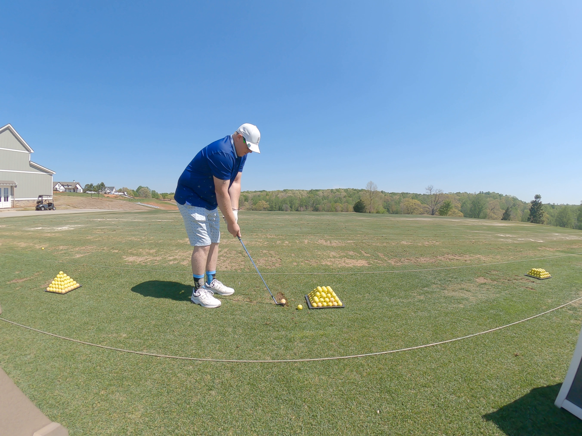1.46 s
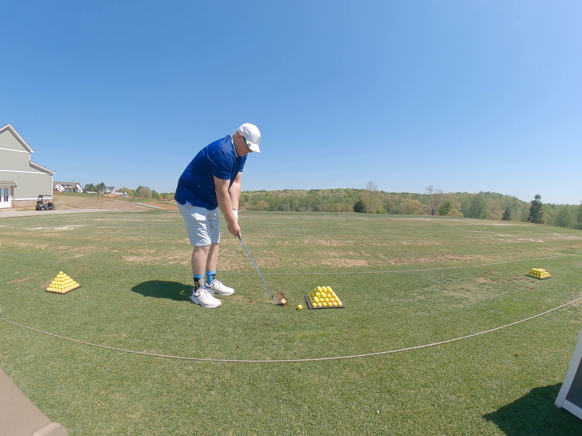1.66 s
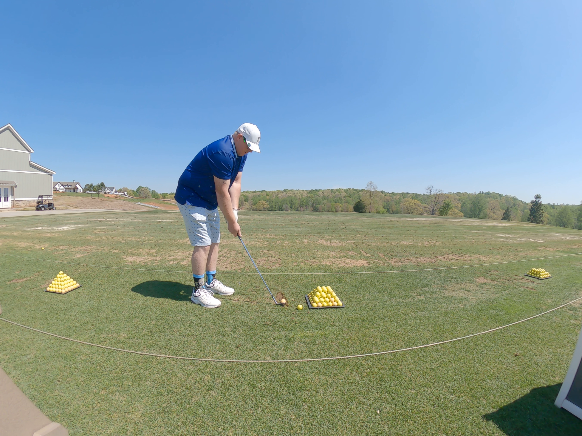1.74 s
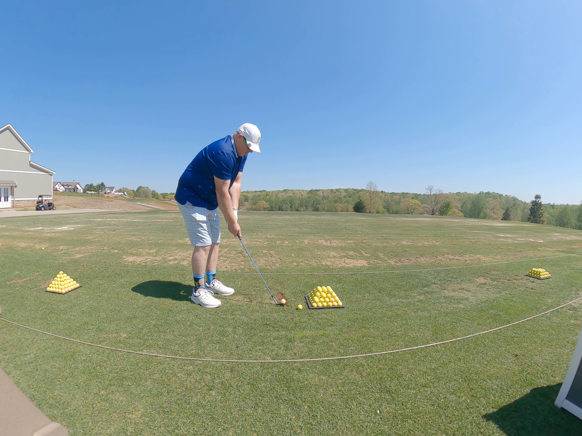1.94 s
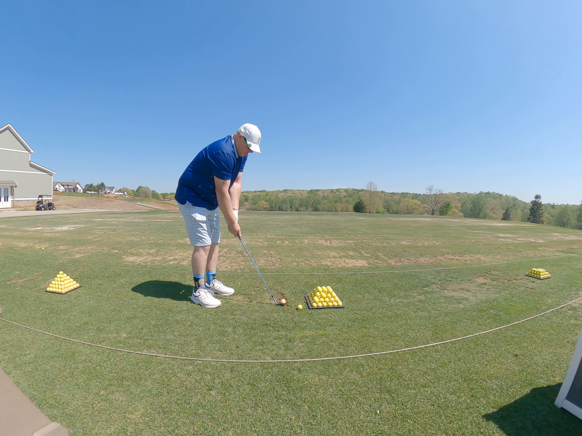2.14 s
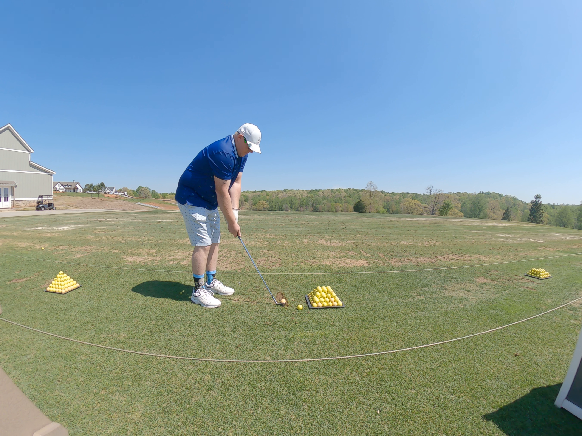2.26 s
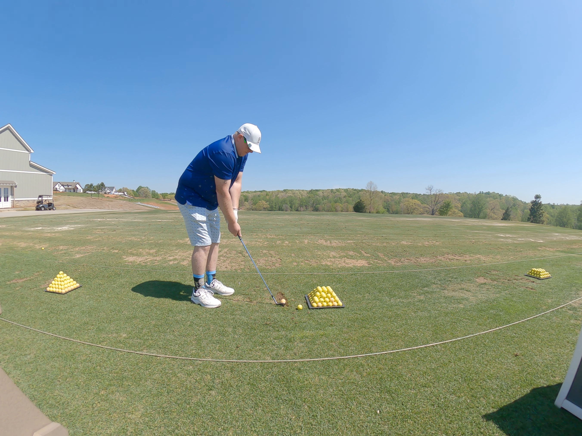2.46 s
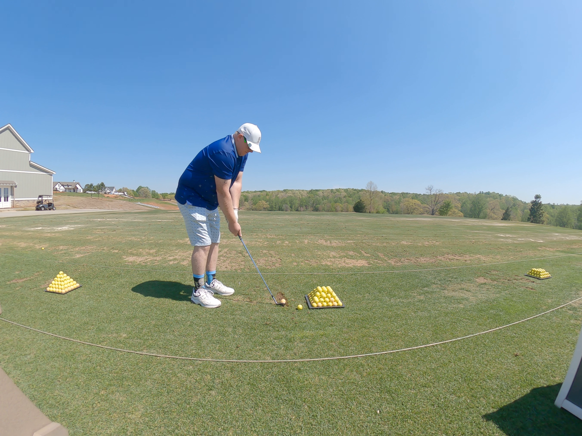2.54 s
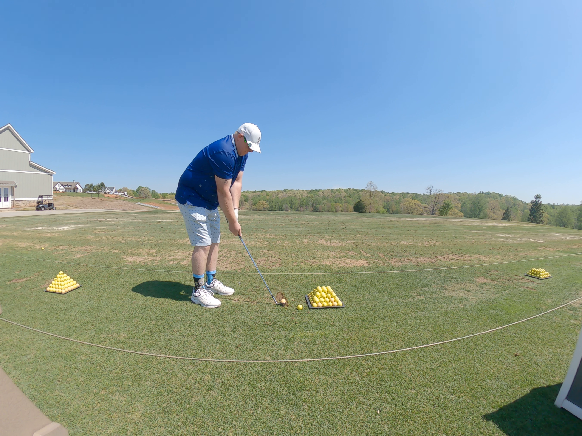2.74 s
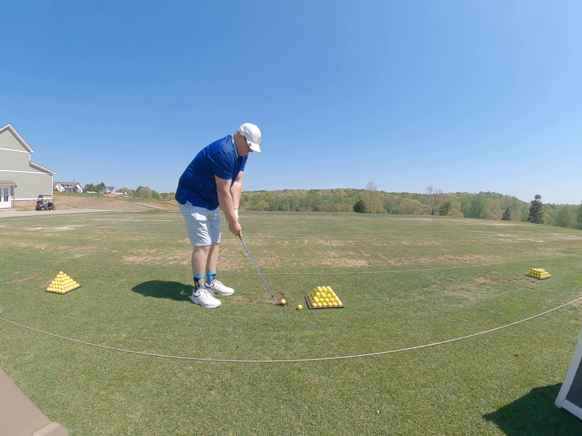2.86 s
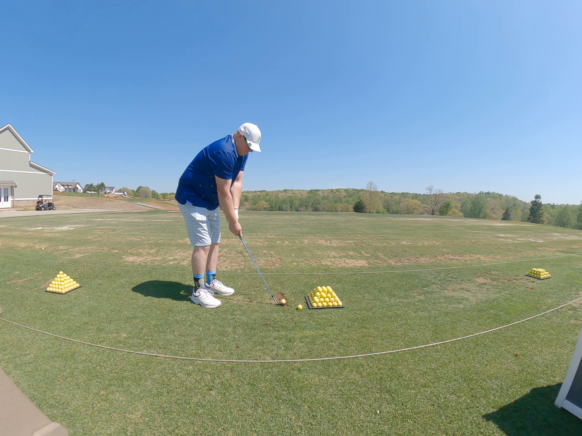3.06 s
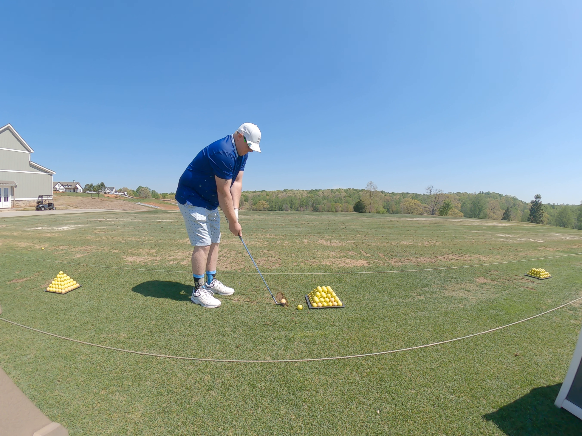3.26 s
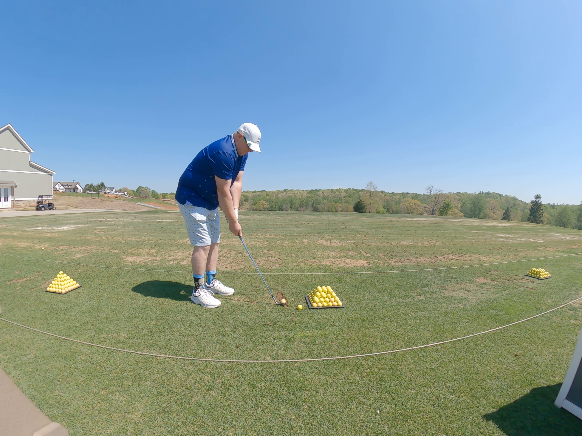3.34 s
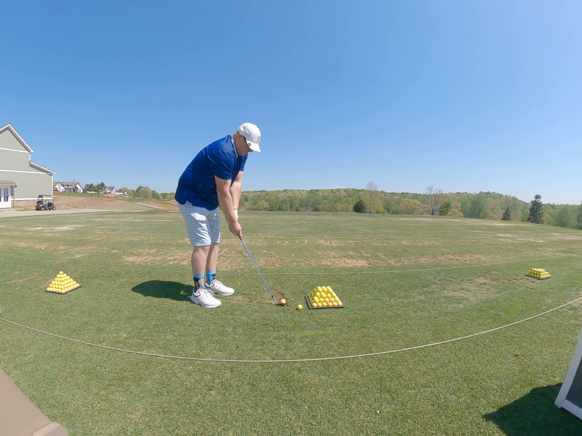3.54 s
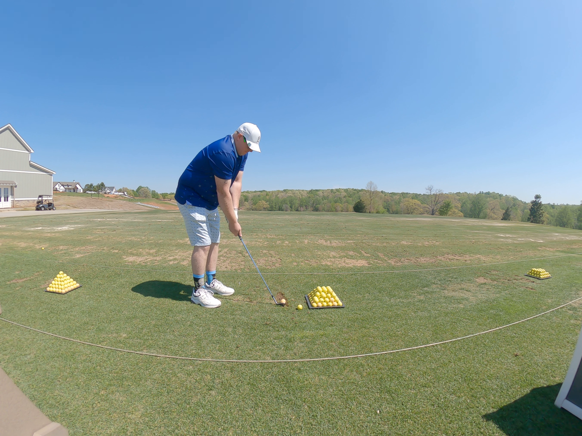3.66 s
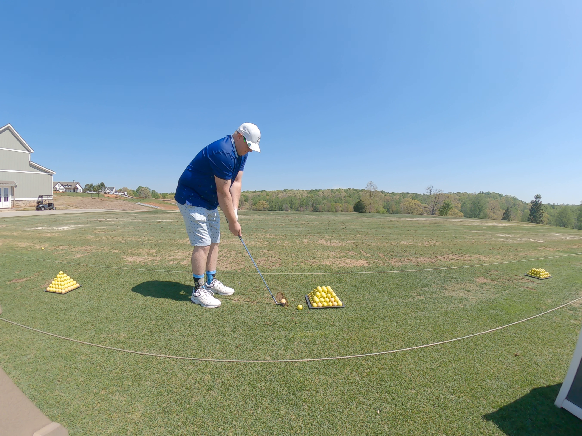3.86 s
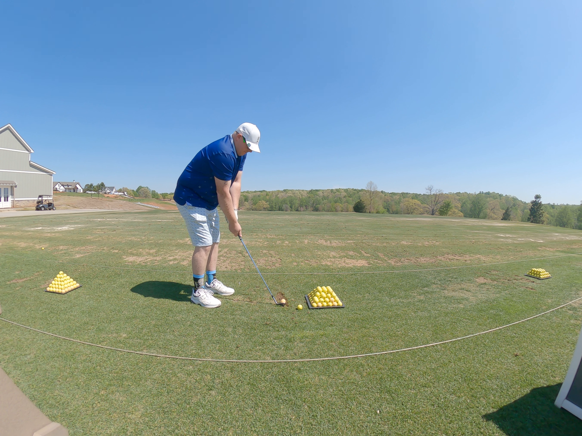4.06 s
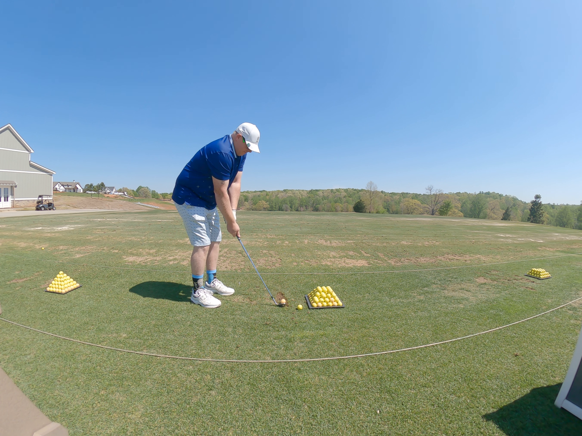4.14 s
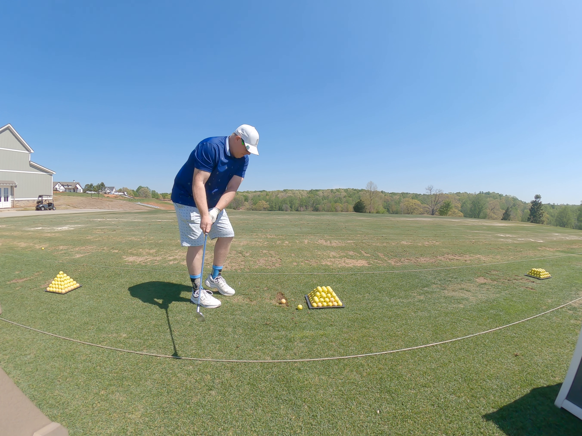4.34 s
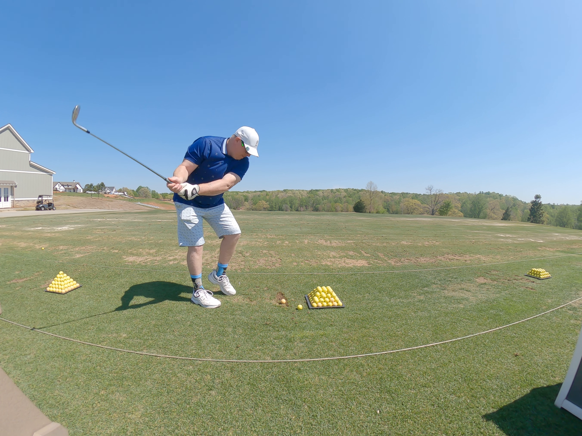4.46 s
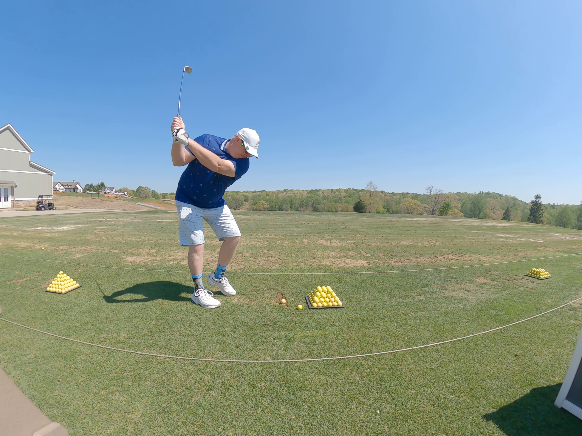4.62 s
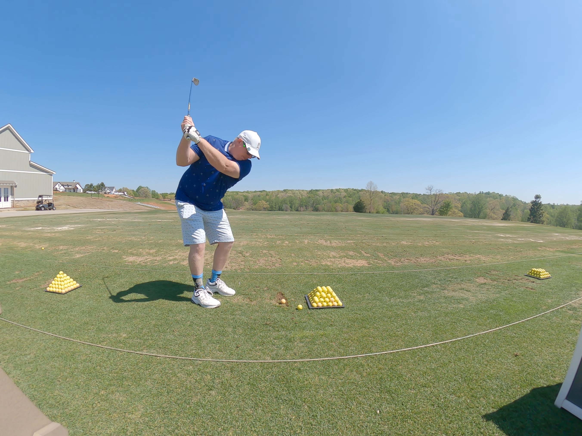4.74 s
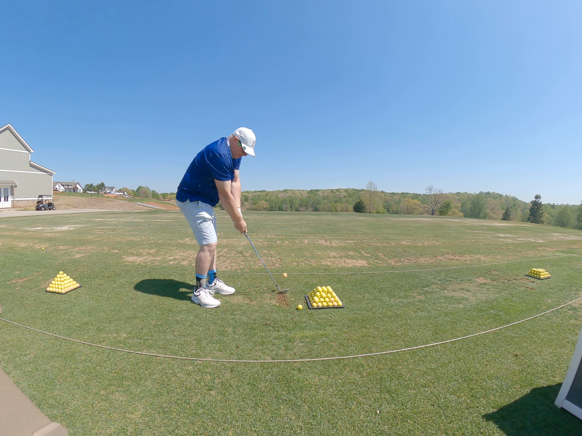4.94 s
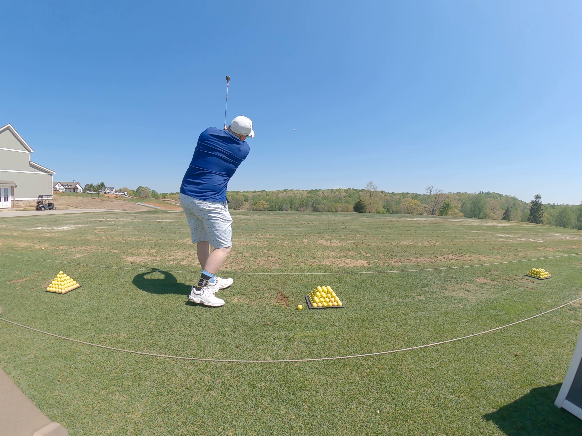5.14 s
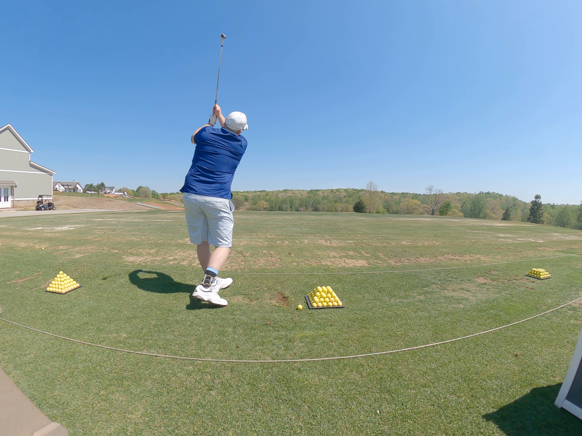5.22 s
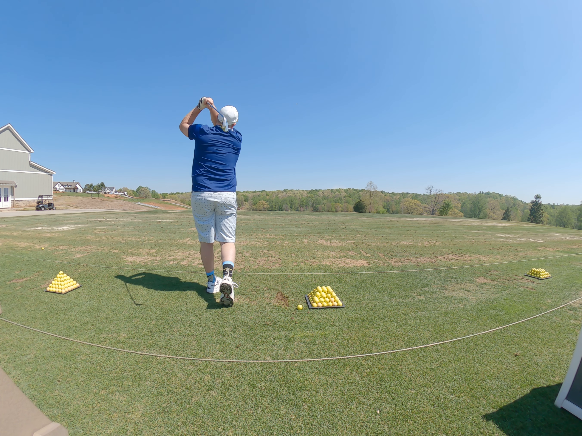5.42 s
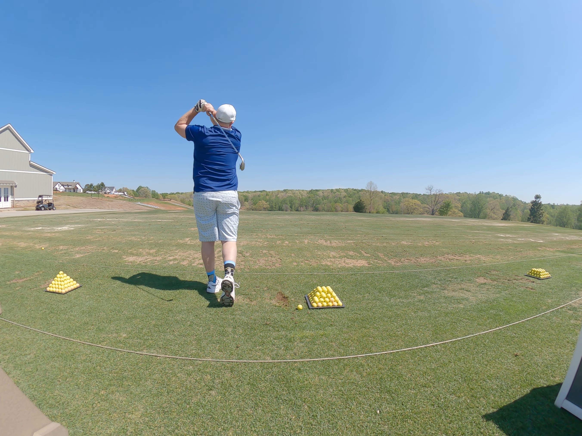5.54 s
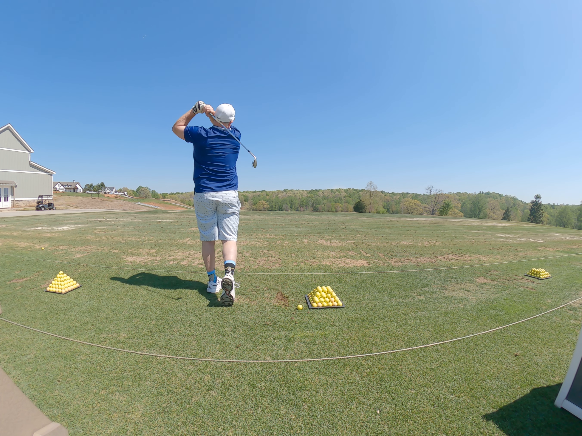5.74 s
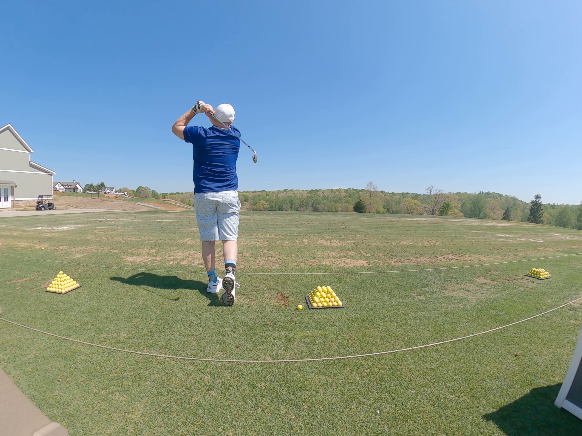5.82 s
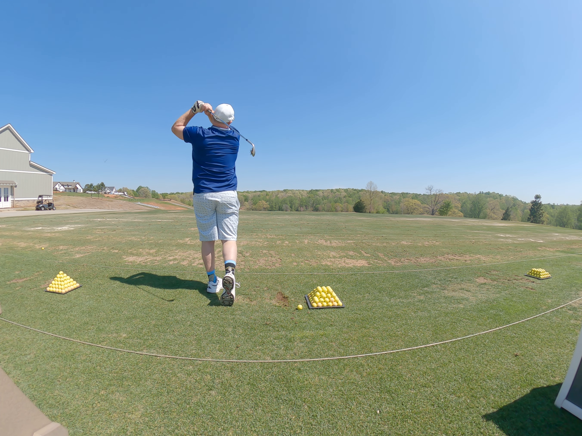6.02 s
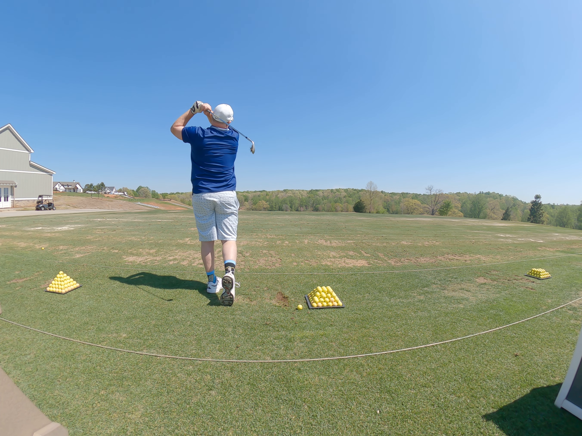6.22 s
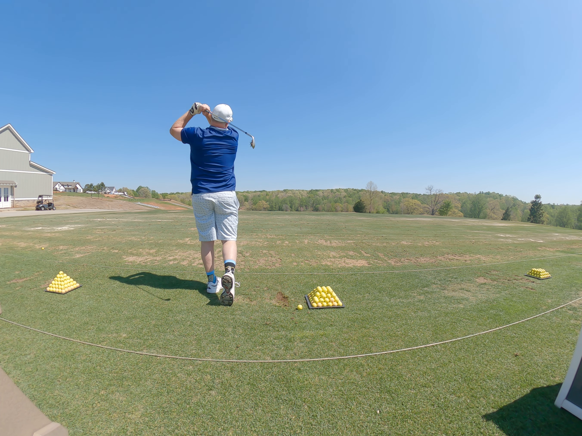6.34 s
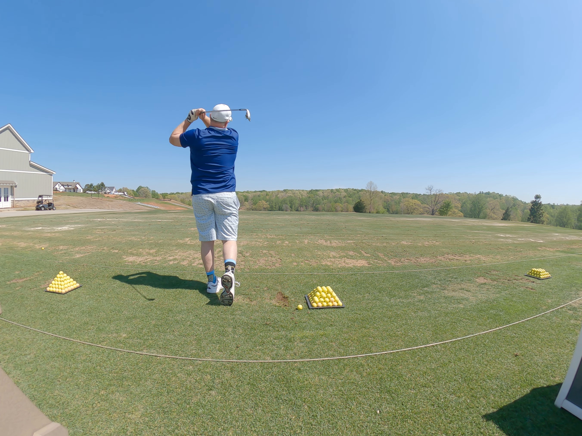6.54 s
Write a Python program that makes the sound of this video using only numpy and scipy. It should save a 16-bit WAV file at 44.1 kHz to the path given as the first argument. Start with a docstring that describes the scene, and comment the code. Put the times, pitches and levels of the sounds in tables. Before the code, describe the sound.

One crisp crack of an iron hitting a golf ball stands out, heard outdoors from a few metres away. Before it there is only a low rumble, the throb of far-off mowers, faint chirps and a couple of soft thumps. A quick swish leads into the hit near the end; then a slight echo returns from a wall, dirt sprinkles onto the grass and shoes scuff quietly as the drone continues.

```python
"""An iron strikes a golf ball on open grass: a brief contact force sets ball and steel head ringing.
Clothes rustle and the shaft sheds vortices on the way down; the turf thuds, soil patters, shoes scuff.
The wall of a house reflects the crack as a chirping echo. Two far-off mowers drone and beat against
each other amid low rumble, faint hiss and birdsong. A small camera hears it from a few metres away."""
import sys
import numpy as np
from scipy import signal
from scipy.fft import rfft, irfft, next_fast_len
from scipy.io import wavfile

SR = 44100
rng = np.random.default_rng(int(sys.argv[2]) if len(sys.argv) > 2 else 0)


def unload_audio(sound):
    """Save the sound as a 16-bit wav file, at the path given as the first command line argument."""
    columns = np.transpose(np.atleast_2d(sound))
    # keep every value between -1 and 1, then stretch to whole-number steps
    steps = np.round(np.clip(columns, -1, 1) * 32767)
    wavfile.write(sys.argv[1], SR, steps.astype(np.int16))


N = 290178
T = np.arange(N) / SR
BRIEF = T[:SR // 4]  # time within one short event
IMPACT_S = 5.0678


def strike(bite_s=0.0032, contact_s=0.00013, ring_t60_s=.018, push_db=-8, snap_db=-13.5, turf_db=-20):
    """Impact excitation: the ball is squashed for half a millisecond, then ball and head ring freely."""
    # modes of ball and shaft: frequency_hz, level_db
    ball_modes = [(612, -27.5), (900, -20), (1210, -17.5), (1445, -13.5), (1730, -19.5), (2064, -22),
                  (2280, -18.5), (2960, -14), (3110, -14), (3320, -15.5)]
    # modes of the steel head: frequency_hz, level_db
    head_modes = [(4260, -25.5), (4800, -27), (5560, -24.5), (6480, -28.5), (7780, -24), (9480, -26)]
    # grooves scraping the ball's cover: frequency_hz, density_db
    snap_spectrum = [(3500, -9), (6000, -5.5), (9500, -1.5), (11000, -9.5), (12900, -30.5), (14200, -23),
                     (16000, -48.5)]
    # blade tearing grass: frequency_hz, density_db
    turf_spectrum = [(150, 7), (900, -0.5), (4000, -9), (9500, -17), (14000, -42.5)]
    squash = (BRIEF - bite_s - contact_s) / contact_s
    push = amp(push_db) * squash * np.exp((1 - squash ** 2) / 2)
    snap = amp(snap_db) * noise(snap_spectrum, decay(t60=.004, after=bite_s))
    release_s = bite_s + 2 * contact_s  # the ball springs off the face
    ball = modes(ball_modes, ring_t60_s, after=release_s)
    head = modes(head_modes, ring_t60_s, after=release_s)
    # the leading edge presses into the grass just before the ball and digs in after it
    press = amp(1.5) * np.sqrt(BRIEF / bite_s) * (BRIEF < bite_s)
    turf = amp(turf_db) * noise(turf_spectrum, press + decay(t60=0.032, after=bite_s))
    crack, bright = np.zeros((2, N))
    add(crack, IMPACT_S - bite_s, push + ball + turf)
    add(bright, IMPACT_S - bite_s, snap + head)
    return crack, bright


def thumps(give_s=0.0014):
    """Damped oscillation: the turf gives softly under each blow and rings for a few cycles."""
    # dull thumps in the ground: start_s, level_db, pitch_hz, t60_s
    blows = [(3.698, -12, 135, 0.023), (4.768, -17.5, 205, 0.039), (5.07, -7, 100, 0.045),
             (5.0713, -12.5, 186, 0.041)]
    onset = (1 - np.exp(-BRIEF / give_s)) ** 2
    out = np.zeros(N)
    for start, db, hz, t60 in blows:
        add(out, start, amp(db) * ring(hz, t60) * onset)
    return out


def echo(delay_s=.148, echo_db=-35.5, spread_s=0.0057):
    """Reflection: each face of the house returns a burst of noise, delayed by its path length."""
    # colour of the reflection: frequency_hz, density_db
    wall_spectrum = [(400, -0.5), (900, -16), (1400, 6), (2150, 5.5), (2700, -2.5), (5200, -1.5),
                     (7500, -13), (14000, -40)]
    # reflecting faces, relative to the main return: offset_s, gain_db
    faces = [(-.024, -6), (0, 1), (.012, -6.5), (.034, -6.5)]
    # rising chirps from evenly spaced boards: start_s, length_s, from_hz, to_hz, level_db
    chirps = [(5.207, .025, 4190, 5900, -41.5), (5.209, 0.0114, 1950, 2310, -33),
              (5.244, 0.013, 1200, 1600, -36)]
    late = T - IMPACT_S - delay_s
    returns = sum(amp(echo_db + db) / (1 + ((late - offset) / spread_s) ** 4) for offset, db in faces)
    return noise(wall_spectrum, returns) + glides(chirps, jitter_hz=70)


def swish(fastest_s=5.048, half_speed_s=.046, impact_loss=0.25, full_speed_db=-38, speed_power=2.3):
    """Vortex shedding: air noise and the shaft's whistles grow with speed, and the whistles rise."""
    # air rushing past the club: frequency_hz, density_db
    air_spectrum = [(300, -12.5), (1200, -3.5), (2200, -9.5), (7500, -19.5), (11000, -31.5), (15000, -52.5)]
    # thick and thin parts of the shaft at full speed: pitch_hz, level_db, speed_exponent
    vortices = [(487, -40, 1.1), (1230, -42.5, 2.5)]
    speed = 1 / (1 + ((T - fastest_s) / half_speed_s) ** 2)
    speed *= 1 - impact_loss * (T > IMPACT_S)  # ball and turf brake the club
    out = noise(air_spectrum, amp(full_speed_db) * speed ** speed_power)
    for hz, db, exponent in vortices:
        out += amp(db) * speed ** exponent * tone(hz * speed ** .3, jitter_hz=.1 * hz, rate=250)
    return out


def clods(t60_s=0.012):
    """Inelastic impact: each falling clod stops with a dull thud and a bright tick of grit."""
    # landings: start_s, thud_db, tick_db
    landings = [(5.238, -42, -39), (5.289, -52, -47), (5.307, -31, -45), (5.326, -51, -41.5),
                (5.367, -41, -53), (5.378, -47, -47), (5.466, -44, -58)]
    # thud of a clod: frequency_hz, density_db
    clod_spectrum = [(500, -10), (1200, 4), (10000, -34)]
    # tick of grit: frequency_hz, density_db
    grit_spectrum = [(2200, -1), (5500, -2), (10500, -17), (14000, -42)]
    out = np.zeros(N)
    for start, thud_db, tick_db in landings:
        add(out, start, amp(thud_db) * noise(clod_spectrum, decay(t60_s)))
        add(out, start, amp(tick_db) * noise(grit_spectrum, decay(t60_s)))
    return out


def soil_shower(peak_s=5.225, peak_db=-43.5, rise_db_per_s=299.5, fall_db_per_s=108, dust_db=-7.5):
    """Shot noise: coarse grains and hissing dust rain down, building quickly and then thinning out."""
    # falling soil and grass: frequency_hz, density_db
    soil_spectrum = [(600, -5.5), (950, 1), (2000, -4.5), (4000, -6.5), (10000, -19.5), (15000, -50.5)]
    late = T - peak_s
    envelope = amp(peak_db + np.minimum(rise_db_per_s * late, -fall_db_per_s * late))
    coarse = envelope * grains(soil_spectrum, per_second=1400, spread_db=3.8)
    return coarse + noise(soil_spectrum, amp(dust_db) * envelope)


def clothes():
    """Friction: dense tiny slips of cloth merge into a rustle with each move."""
    # small shifts over the ball, then the swing: middle_s, length_s, level_db
    moves = [(.05, 0.27, -69), (4.32, 0.28, -68), (4.62, 0.5, -63.5), (4.95, 0.31, -63.5), (5.3, 0.53, -64),
             (5.75, 0.52, -75)]
    # rubbing cloth: frequency_hz, density_db
    cloth_spectrum = [(600, -3), (1200, 2.5), (2500, -2), (7500, -4.5), (13000, -17.5), (16000, -42.5)]
    return swells(moves) * grains(cloth_spectrum, per_second=9800, spread_db=1.5)


def shoes():
    """Stick-slip friction: soles grind on the grass in short grainy bursts."""
    # twists of a shoe: middle_s, length_s, level_db
    scuffs = [(4.77, 0.047, -54.5), (5.31, 0.026, -49), (5.52, 0.055, -58), (5.602, 0.039, -53),
              (5.66, 0.067, -50.5), (5.771, 0.032, -52.5), (5.812, 0.041, -49.5)]
    # sole on grass: frequency_hz, density_db
    sole_spectrum = [(300, 3.5), (720, -2.5), (980, 3), (1500, -6), (2800, -18), (5500, -17), (14000, -52)]
    return swells(scuffs) * grains(sole_spectrum, per_second=1600, spread_db=3.0)


def clicks():
    """Damped transients: light contacts of grip, clothing and shoes each excite a band of noise."""
    # contacts: start_s, level_db, t60_s, centre_hz
    contacts = [(0.128, -57, 0.049, 7000), (4.591, -48.5, 0.018, 4186), (5.008, -40.5, 0.011, 4627),
                (5.626, -48.5, .03, 1700), (5.766, -52, 0.027, 1600), (5.806, -48, 0.025, 4200)]
    # band of one click: multiple_of_centre, density_db
    band = [(0.249, -11.5), (.45, -5.5), (1, -1), (2, -17.5), (3.2, -48)]
    out = np.zeros(N)
    for start, db, t60, hz in contacts:
        spectrum = [(multiple * hz, density_db) for multiple, density_db in band]
        add(out, start, amp(db) * noise(spectrum, decay(t60)))
    return out


def taps(t60_s=0.096):
    """Free vibration: the club head brushes the grass and rings faintly."""
    # light touches of the head: start_s, level_db
    touches = [(.894, -61), (3.972, -59.5), (5.592, -58)]
    # brushed grass: frequency_hz, density_db
    brush_spectrum = [(1000, 0), (4600, 0), (9500, -12), (13000, -24)]
    # modes of the tapped head: frequency_hz, level_db
    tap_modes = [(3090, -10), (5260, -6), (9220, -15)]
    out = np.zeros(N)
    for start, db in touches:
        add(out, start, amp(db) * (noise(brush_spectrum, decay(t60_s)) + modes(tap_modes, t60_s)))
    return out


def mowers(overtone_gain_db=-5):
    """Beating: two engines fire about 19 Hz apart, so their summed drone throbs."""
    # nearer engine's speed: time_s, firing_hz
    near_rate = [(0, 84.26), (1.5, 84.97), (2.8, 84.3), (4, 84.18), (5.3, 83.3), (6.58, 83.4)]
    # its two lowest harmonics: time_s, level_db
    low_level = [(0.0, -41.5), (1.13, -36), (2.78, -38.5), (4.31, -36.5), (5.59, -36.5), (6.58, -37.5)]
    # its higher harmonics, before their gain: time_s, level_db
    overtone_level = [(1.24, -58), (1.72, -61), (2.75, -53), (3.46, -61), (5.44, -51.5), (6.29, -57.5)]
    # balance of those harmonics: multiple, gain_db
    near_orders = [(3, -3), (4, 1), (5, -7.5), (6, -12.5)]
    # farther engine: time_s, firing_hz, level_db, overtone_gain_db
    far_engine = [(0, 104.8, -50, 12), (.5, 104, -50.5, 4.5), (1.5, 104.2, -54.5, 2.5),
                  (3, 103.1, -48, -2.5), (3.4, 103.1, -44.5, -2.5), (6.58, 101.9, -42.5, -3.5)]
    # balance of its overtones: multiple, gain_db
    far_orders = [(2, -9), (3, -18.5)]
    near_hz = curve(near_rate) * (1 + .003 * walk(12))
    low = drone(near_hz, [(1, 0.92)], fade_db=1.6) + drone(near_hz, [(2, -14.5)], fade_db=1.7)
    overtones = amp(curve(overtone_level) + overtone_gain_db) * drone(near_hz, near_orders, fade_db=1.7)
    far_hz = curve(far_engine) * (1 + 0.0024 * walk(13))
    far = drone(far_hz, [(1, 0.0006)], fade_db=1.5)
    far += amp(curve(far_engine, 3)) * drone(far_hz, far_orders, fade_db=3.0)
    return amp(curve(low_level)) * low + overtones + amp(curve(far_engine, 2)) * far


def drone(hz, orders, fade_db):
    """Harmonic series of an engine's firing rate; moving air fades each harmonic on its own."""
    phase = 2 * np.pi * (np.cumsum(hz) / SR + rng.random())
    return np.sqrt(2) * sum(amp(db + fade_db * walk(3.7)) * np.sin(round(k) * phase) for k, db in orders)


def birds(reverb_db=-6):
    """Reverberation: the wood behind the tree line smears the birds' slightly hoarse whistles."""
    # a songbird's notes: slide_s, lead_s, arch_db, ending_db
    notes = [(.532, 0.028, -82, -75), (1.146, .04, -81, -81), (1.417, 0.064, -68.5, -71),
             (1.614, 0.032, -76, -77), (2.033, 0.053, -81, -77), (2.448, 0.065, -69, -70.5),
             (2.54, .049, -74, -74), (2.952, 0.061, -68.5, -67.5), (3.62, 0.079, -72.5, -68)]
    # other birds: start_s, length_s, from_hz, to_hz, level_db
    whistles = [(0.018, 0.12, 3720, 3590, -69.5), (0.683, 0.087, 3650, 3650, -80),
                (3.025, .035, 3900, 3780, -75), (5.51, .04, 2660, 3370, -63.5),
                (6.419, 0.096, 2582, 2340, -75.5)]
    song = glides(whistles, jitter_hz=50)
    for slide_at, lead_s, arch_db, ending_db in notes:
        add(song, slide_at - lead_s, slur(lead_s, arch_db, ending_db))
    wood = rng.standard_normal(len(BRIEF)) * decay(t60=0.4)
    return song + amp(reverb_db) * signal.oaconvolve(song, wood / np.linalg.norm(wood))[:N]


def slur(lead_s, arch_db, ending_db):
    """Frequency modulation: one bird note arches, slides down hoarsely and holds a short low ending."""
    top_hz, sag_hz, arch_s = 3170, 220, 0.05  # the arch peaks arch_s before the slide
    slide_s, ending_hz, ending_s = 0.0082, 2200, 0.041
    clear_jitter_hz, hoarse_jitter_hz, hoarse_s = 24, 160, .028
    flutter_db, dip_db = 2.3, 4
    since = BRIEF - lead_s
    slid = (1 + np.tanh(since / slide_s)) / 2
    arch = top_hz - sag_hz * (1 + np.minimum(since, 0) / arch_s) ** 2
    pitch = arch * (1 - slid) + ending_hz * (1 + .02 * rng.standard_normal()) * slid
    swell = np.sqrt(np.abs(np.sin(np.pi * np.minimum(BRIEF / (lead_s + ending_s), 1))))
    db = arch_db * (1 - slid) + ending_db * slid + flutter_db * walk(150, BRIEF)
    db -= dip_db * np.exp(-(since / slide_s) ** 2)
    jitter = clear_jitter_hz + hoarse_jitter_hz * slid * np.exp(-(since / hoarse_s) ** 2)
    return swell * amp(db) * tone(pitch, jitter_hz=jitter, rate=810, t=BRIEF)


def distance(whine_db=-60, whine_fade_db_per_s=38):
    """Spatial coherence: long waves of far rumble are more alike at both microphone ports than hiss."""
    # rumble of engines and air: frequency_hz, density_db
    rumble_spectrum = [(12, -30), (30, -14.5), (58, 1.5), (100, -2.5), (190, -11), (390, -23.5),
                       (520, -33.5), (800, -45)]
    # hiss of roads and trees: frequency_hz, density_db
    hiss_spectrum = [(400, 2), (750, -12.5), (1080, -0.5), (1400, -4), (1900, -13.5), (3200, -22.5),
                     (5200, -21), (7500, -23.5), (9500, -36.5), (14000, -40.5)]
    # one soft far rustle: middle_s, length_s, level_db
    rustle_swell = [(.41, 0.35, -69.5)]
    # its colour: frequency_hz, density_db
    rustle_spectrum = [(1050, 4), (1950, -0.5), (2600, -24)]
    # light puffs of air: middle_s, length_s, level_db
    puffs = [(.62, 0.47, -77), (1.75, 0.99, -79.5), (2.98, 0.39, -78.5), (6.48, 0.23, -78)]
    # the leaves they stir: frequency_hz, density_db
    leaf_spectrum = [(2800, -9.5), (4600, -1), (7600, -1.5), (14000, -28.5)]
    rumble_rms = amp(-43.5 + 1.6 * walk(4.4))
    hiss_rms = amp(-67.5 + 0.21 * walk(1.2))
    whine = amp(whine_db - whine_fade_db_per_s * T) * tone(1290, jitter_hz=70, rate=290)
    side = noise([(40, -15.5), (200, -5.5), (500, -23.5)], amp(-20.0) * rumble_rms)
    side += noise(hiss_spectrum, amp(-1.5) * hiss_rms)
    rustle = noise(rustle_spectrum, swells(rustle_swell)) + noise(leaf_spectrum, swells(puffs))
    mid = noise(rumble_spectrum, rumble_rms) + noise(hiss_spectrum, hiss_rms) + rustle + whine
    return np.array([mid + side, mid - side])


def amp(db):
    """Decibels to amplitude gain."""
    return np.exp(np.asarray(db) * np.log(10) / 20)


def curve(rows, column=1):
    """Linear interpolation of one table column over time."""
    rows = np.array(rows)
    return np.interp(T, rows[:, 0], rows[:, column])


def walk(rate, t=T):
    """Random drift through `rate` new values a second, with a spread near 1."""
    steps = rng.standard_normal(size=2048)
    return np.interp(t * rate, np.arange(len(steps)), steps) * np.sqrt(3 / 2)


def swells(rows):
    """Gaussian envelopes from (middle_s, length_s, level_db) rows; overlapping ones add in power."""
    power = sum((amp(db) * np.exp(-(2 * (T - middle) / length) ** 2)) ** 2 for middle, length, db in rows)
    return np.sqrt(power)


def decay(t60, after=0):
    """Exponential decay: a jump to 1, then 60 dB down in t60 seconds."""
    return (BRIEF >= after) * np.exp(-np.log(1000) * np.clip((BRIEF - after) / t60, 0, 10))


def ring(hz, t60, after=0):
    """One struck mode: a damped sinusoid."""
    return decay(t60, after) * np.sin(2 * np.pi * hz * (BRIEF - after))


def modes(rows, t60, after=0):
    """Superposition of one object's (frequency_hz, level_db) modes, struck together."""
    return sum(amp(db) * ring(hz, t60, after) for hz, db in rows)


def tone(hz, jitter_hz, rate, t=T):
    """A sinusoid under random frequency modulation."""
    return np.sin(2 * np.pi * np.cumsum(hz + jitter_hz * walk(rate, t)) / SR)


def glides(rows, jitter_hz):
    """Linear frequency sweeps from (start_s, length_s, from_hz, to_hz, level_db) rows."""
    out = np.zeros(N)
    for start, length, from_hz, to_hz, db in rows:
        along = np.minimum(BRIEF / length, 1)
        sweep = tone(from_hz + (to_hz - from_hz) * along, jitter_hz, rate=630, t=BRIEF)
        add(out, start, amp(db) * np.sin(np.pi * along) * sweep)
    return out


def colour(x, spectrum):
    """Spectral shaping by (frequency_hz, density_db) points; white noise keeps its level."""
    size = next_fast_len(len(x) + len(BRIEF))
    hz, db = np.transpose(spectrum)
    f = np.maximum(np.fft.rfftfreq(size, 1 / SR), 1)
    skirts = (np.minimum(f / hz[0], 1) * np.minimum(hz[-1] / f, 1)) ** 2
    gain = amp(np.interp(np.log(f), np.log(hz), db)) * skirts
    return irfft(rfft(x, size) * gain, size)[:len(x)] / np.sqrt(np.mean(gain ** 2))


def noise(spectrum, envelope):
    """Coloured noise whose rms follows an envelope."""
    return colour(rng.standard_normal(len(envelope)) * envelope, spectrum)


def grains(spectrum, per_second, spread_db):
    """A Poisson train of tiny clicks of uneven size, rms near 1."""
    size = amp(spread_db * np.minimum(rng.exponential(size=N), 3))
    impulses = (rng.random(N) < per_second / SR) * size * rng.choice([-1, 1], N)
    return colour(impulses / np.std(impulses), spectrum)


def add(track, start, sound):
    """Mix a short sound into a track at `start` seconds."""
    first = int(start * SR)
    track[first:first + len(sound)] += sound[:N - first]


def place(x, pan_db, lag_samples=0):
    """Level and time differences at two close ports: the left is pan_db louder and lag_samples later."""
    return np.array([np.roll(x, lag_samples) * amp(pan_db / 2), x * amp(-pan_db / 2)])


def scene():
    """Superposition in stereo: the crack leans right; its bright snap, golfer and birds lean left."""
    patter = clods() + soil_shower()
    crack, snap = strike()
    shot = place(crack, pan_db=-3.5, lag_samples=1) + place(snap, pan_db=1.0) + thumps()
    wall = place(echo(), pan_db=2.0)
    golfer = clothes() + swish() + shoes() + clicks() + taps()
    background = mowers() + distance() + place(birds(), pan_db=9.0, lag_samples=-3)
    return shot + wall + place(golfer + patter, pan_db=4.5) + background


def record(dry, rolloff_hz=13000, top_hz=15000, fade_s=.006):
    """Band limiting: the camera softens the treble, clips at full scale and cuts the top."""
    soft = signal.sosfilt(signal.butter(2, rolloff_hz, fs=SR, output="sos"), dry)
    fade = np.minimum((T[-1] - T) / fade_s, 1)  # a brief fade ends the sound
    top_cut = signal.ellip(8, .2, 70, top_hz, fs=SR, output="sos")
    return signal.sosfilt(top_cut, fade * np.clip(soft, -1, 1))


dry = scene()
out = record(dry)
unload_audio(out)
```